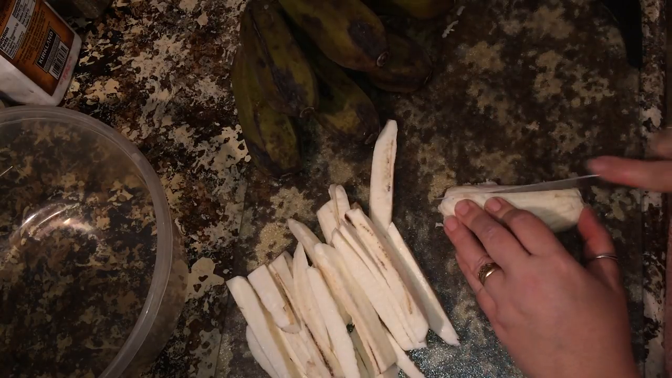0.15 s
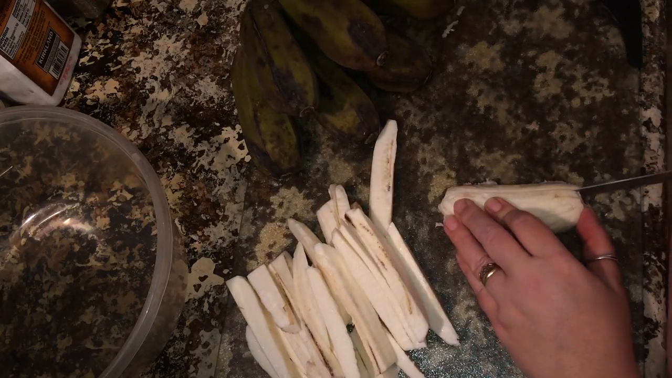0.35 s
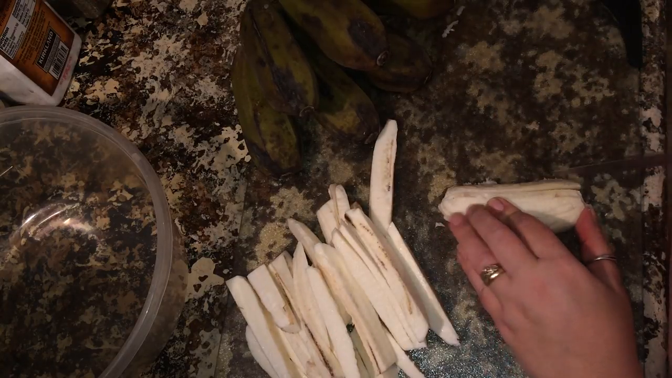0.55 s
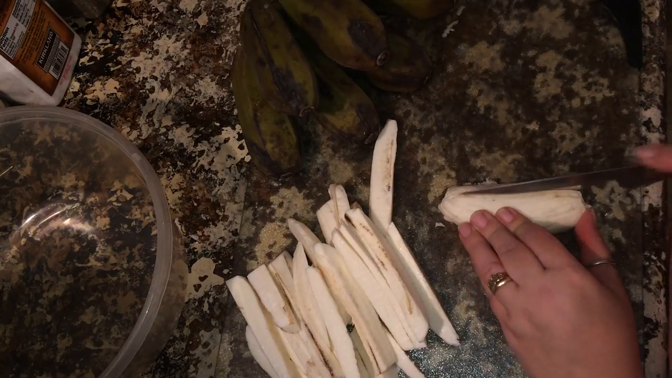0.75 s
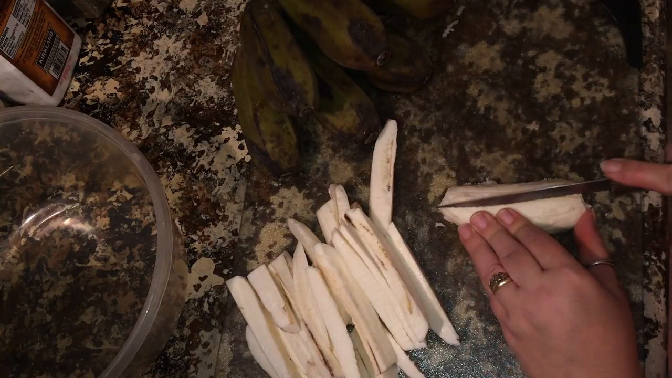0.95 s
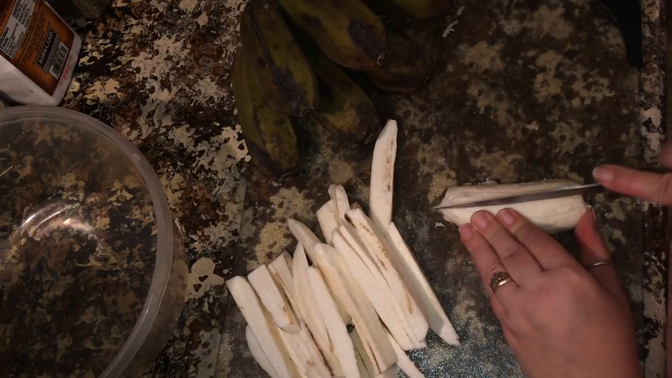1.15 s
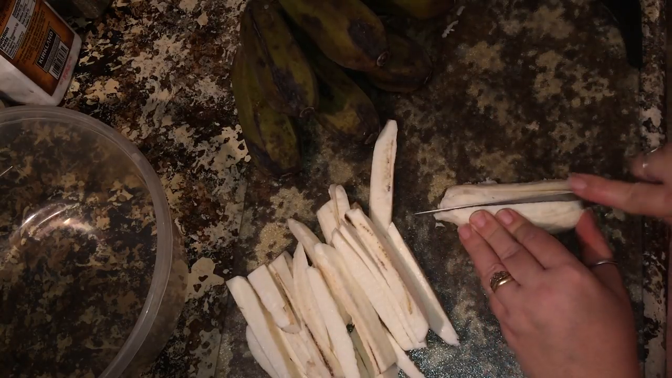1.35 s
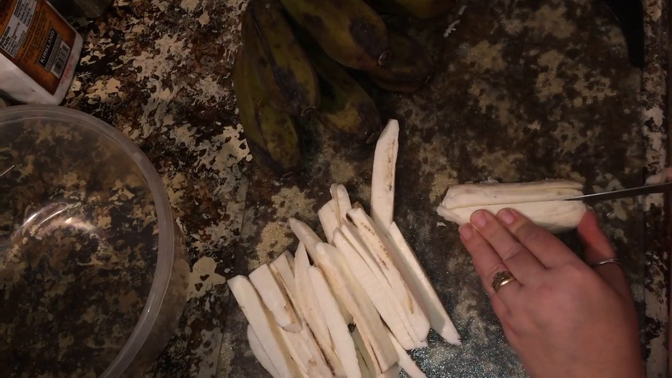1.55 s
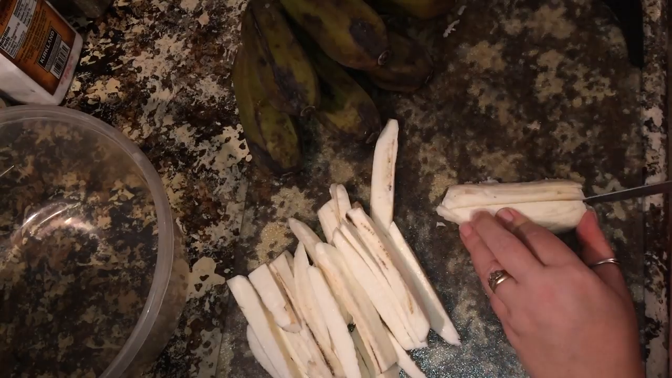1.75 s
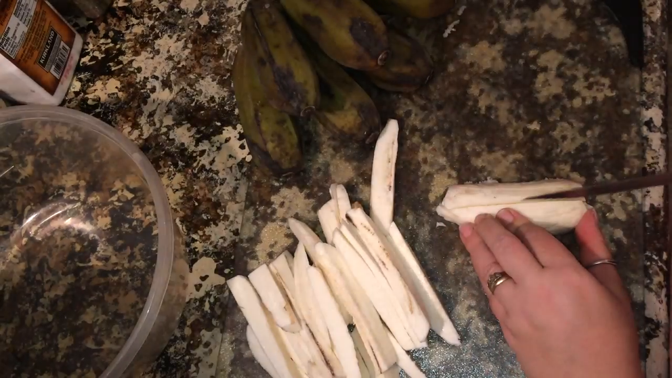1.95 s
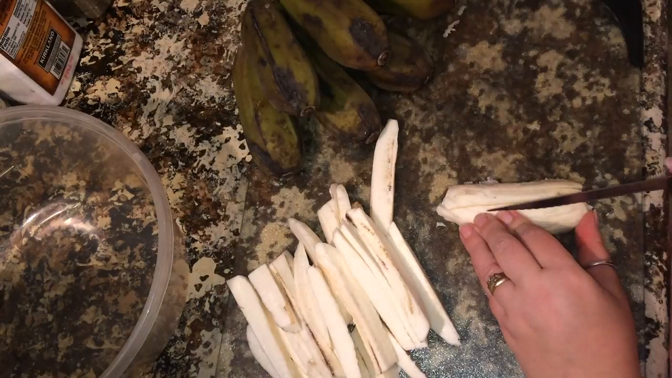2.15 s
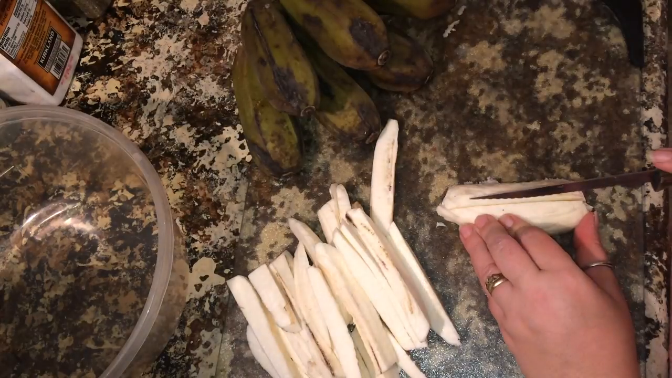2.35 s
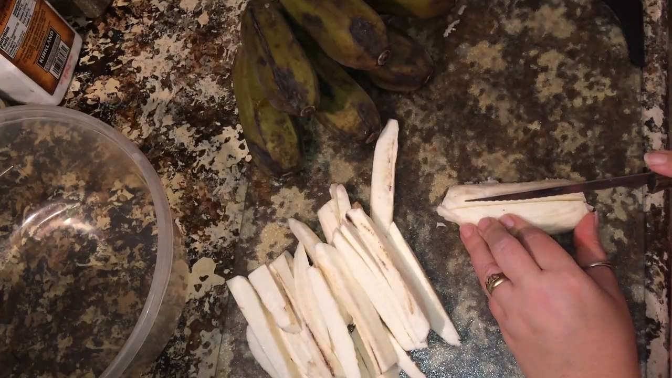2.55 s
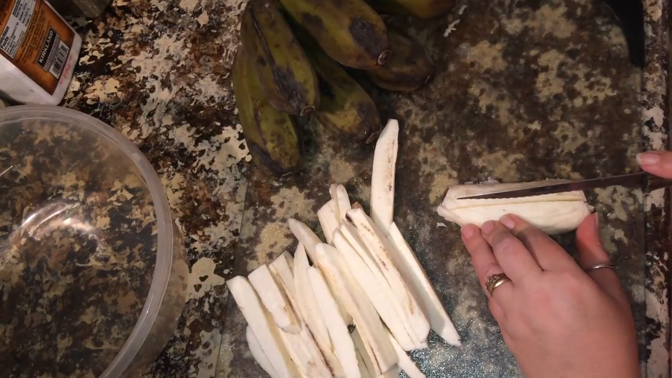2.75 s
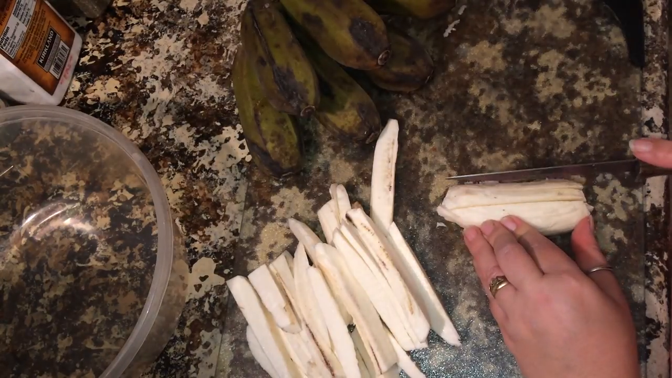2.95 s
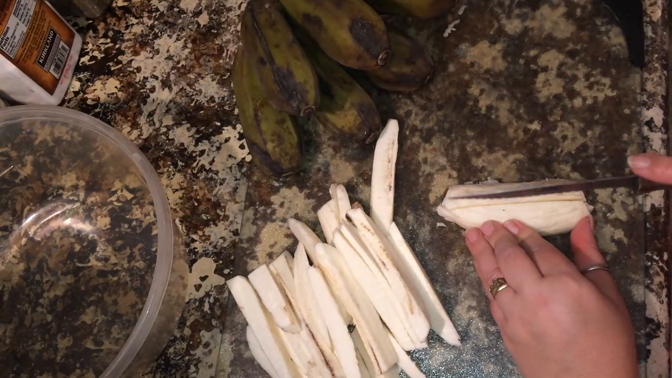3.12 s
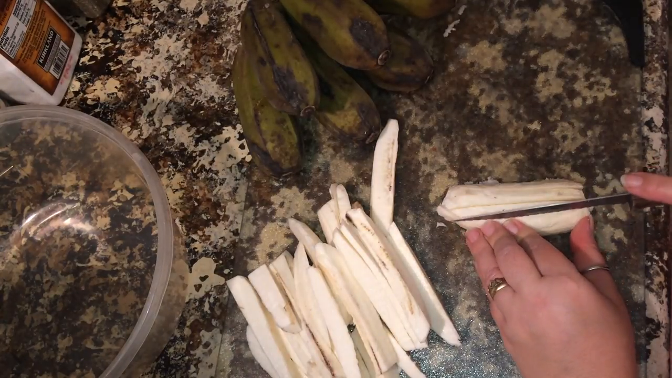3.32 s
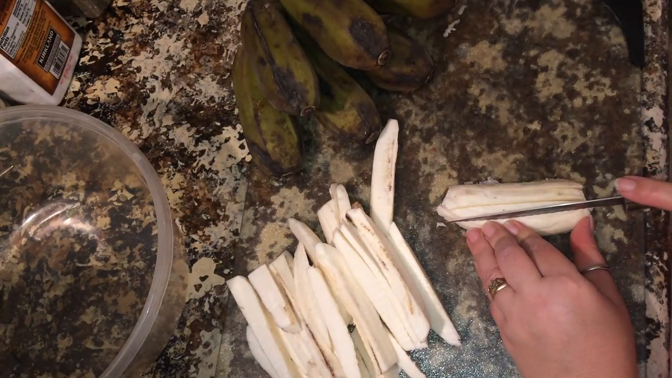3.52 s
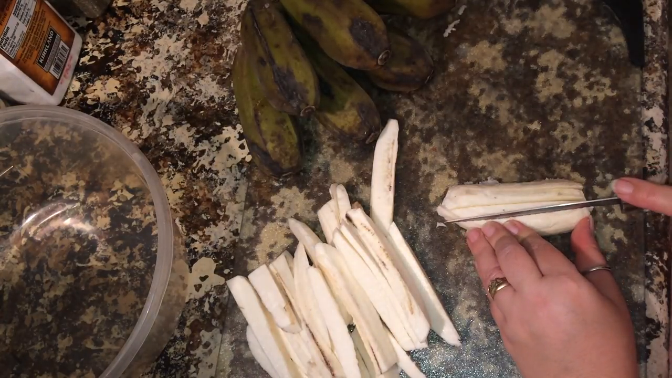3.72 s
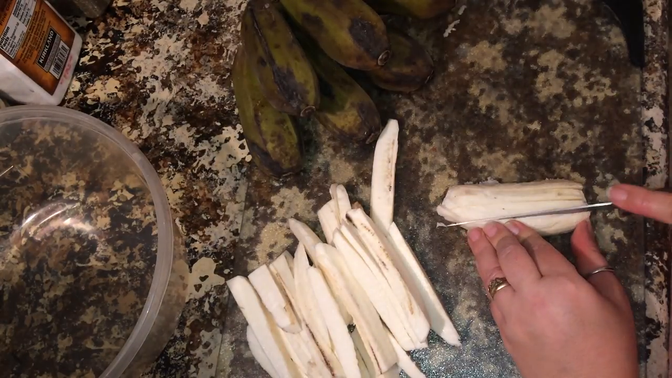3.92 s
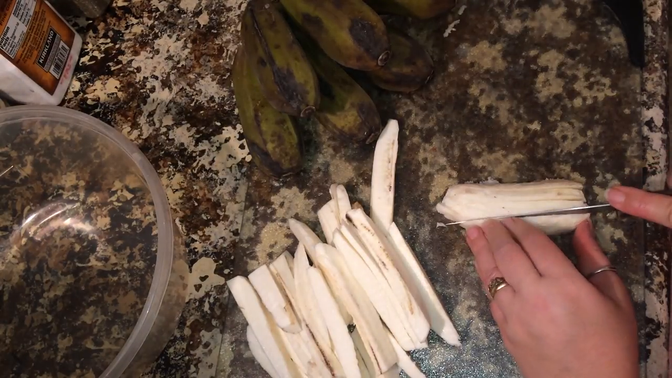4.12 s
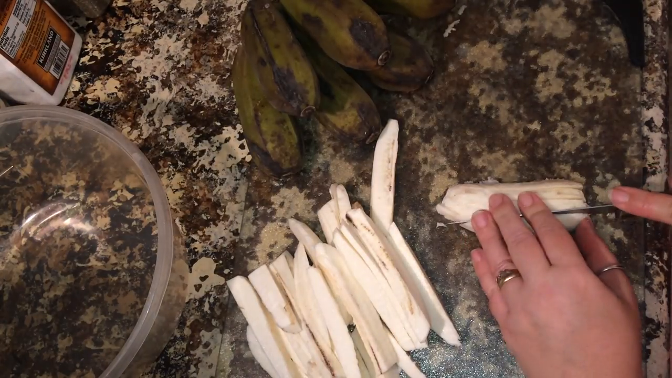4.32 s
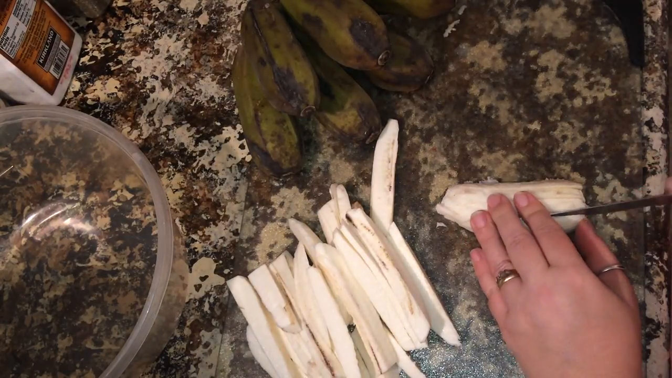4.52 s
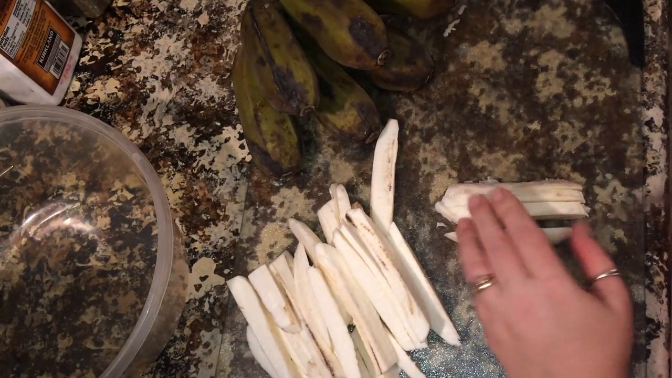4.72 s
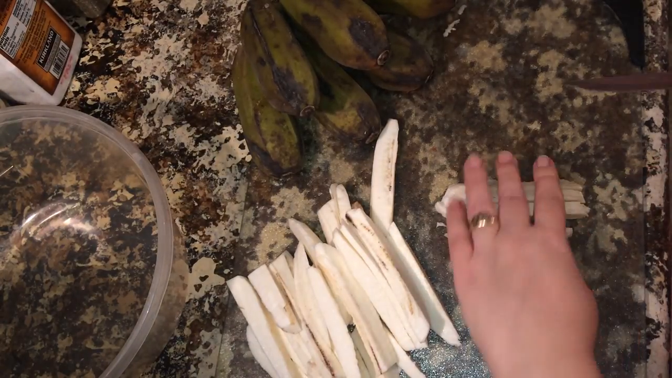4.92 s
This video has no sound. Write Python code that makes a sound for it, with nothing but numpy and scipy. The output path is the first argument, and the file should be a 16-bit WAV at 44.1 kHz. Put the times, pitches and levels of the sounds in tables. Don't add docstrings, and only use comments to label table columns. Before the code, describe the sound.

A knife clicks on a stone counter and scrapes with a gritty metallic rasp, twice quickly, then once more after a quiet gap, over faint fridge hum.

```python
import sys
import numpy as np
from scipy import signal
from scipy.fft import rfft, irfft, next_fast_len
from scipy.io import wavfile
from scipy.ndimage import uniform_filter1d, map_coordinates

SR = 44100
rng = np.random.default_rng(int(sys.argv[2]) if len(sys.argv) > 2 else 0)


def waveform_to_disk(signal):
    frames = np.transpose(np.atleast_2d(signal))
    scaled = np.clip(frames, -1, 1) * 32767
    samples = np.round(scaled).astype(np.int16)
    wavfile.write(sys.argv[1], SR, samples)


def boost_factor(decibels):
    exponent = np.asarray(decibels, float) / 20
    return 10 ** exponent


N = 223621

# pitch_hz, width_hz, level_db
HANDLE_RING = [(450, 39, -5), (687, 120, -1.5), (874, 165, -0.5), (969, 64, 1.5), (1035, 50, -5),
               (1314, 260, -9)]
# pitch_hz, width_hz, level_db
GRIPPED_RING = [(463, 60, -12.5), (731, 88, 1.5), (910, 120, -5), (996, 73, -3), (1314, 190, -23)]
# pitch_hz, width_hz, level_db
FLAT_RING = [
    [(1508, 110, -4.5), (1800, 68, 2.5), (2363, 150, 3), (2810, 63, 4), (3046, 48, 5.5), (3410, 300, 4.5),
     (3663, 72, 1.5)],
    [(4400, 400, -16.5), (5230, 99, 6), (5680, 240, 6), (6350, 120, 10)],
    [(7180, 650, 12), (7930, 200, 18), (8530, 650, 13), (9630, 140, 6.5), (10400, 400, -12),
     (11470, 470, 6.5), (13300, 1500, -49)],
]


def unit(x):
    return x / np.sqrt(np.mean(x ** 2) + 1e-20)


def along(points, hz):
    point_hz, value = np.transpose(points)
    return np.interp(np.log(hz + 1), np.log(point_hz + 1), value)


def curves(rows):
    s, *columns = np.transpose(rows)
    t = np.arange(N) / SR
    return np.array([np.interp(t, s, column) for column in columns])


def wobble(rate):
    knots = rng.standard_normal(int(N * rate / SR) + 4)
    return map_coordinates(knots, [np.arange(N) * rate / SR], order=1)


def swell(s, rise, fall):
    t = np.arange(N) / SR - s
    return np.maximum(-t / rise, t / fall)


def filtered(x, response):
    m = next_fast_len(len(x) + 8192)
    gain = response(np.fft.rfftfreq(m, 1 / SR))
    gain = gain / np.sqrt(np.mean(np.abs(gain) ** 2))
    return irfft(rfft(x, m) * gain, m)[:len(x)]


def ringing(modes, band, broad_db):
    def response(f):
        jf = 1j * f
        total = boost_factor(broad_db)
        for k, (pitch, width, db) in enumerate(modes):
            total = total + (-1) ** k * boost_factor(db) * jf * width / (pitch * pitch - f * f + jf * width)
        low, high = jf / band[0], jf / band[1]
        highpass = low ** 2 / (1 + np.sqrt(2) * low + low ** 2)
        lowpass = 1 / (1 + np.sqrt(2) * high + high ** 2)
        return total * (highpass * lowpass) ** 2
    return response


def grit(steady, snag_db, life):
    chance, size = rng.random(N), rng.random(N)
    snags = (chance < 450 / SR) * boost_factor(snag_db * size)
    jolts = signal.lfilter([1], [1, -np.exp(-1 / (life * SR))], snags)
    return (steady + jolts) * boost_factor(1.7 * wobble(250) + 1.5 * wobble(1400))


def levelled(force):
    return force / np.sqrt(np.abs(uniform_filter1d(force ** 2, size=800)))


def shifting(depth_db):
    z = signal.stft(rng.standard_normal((4, N)), nperseg=256)[2]
    field = rng.standard_normal(z.shape[1:])
    field = uniform_filter1d(field, size=3, axis=0)
    field = uniform_filter1d(field, size=12, axis=1)
    return unit(signal.istft(z * boost_factor(depth_db * unit(field)), nperseg=256)[1][:, :N])


def knife(strokes, hits, hold, modes, broad_db, force, noise):
    lean_share = np.array([1, 0.052, 0.088, 0.18])
    bite_share = np.array([0.11, 0, 0.85, 0.81])
    # low_hz, high_hz
    parts_hz = [(380, 1500), (1100, 4700), (3500, 8000), (6000, 19000)]
    crack, crack_t60_s = 0.84, 0.0025
    tick_db, tick_hz = -2, (800, 10000)
    level, shock = np.zeros((2, 4, N + SR))
    handle_db, edge_db, tip_db, tip_catch_db, t60 = hold

    firm = np.array([handle_db, 0, edge_db, tip_db])
    for rows in strokes:
        span = slice(round(rows[0][0] * SR), round(rows[-1][0] * SR))
        pressure, lean, bite = curves(rows)[:, span]
        rub_db = firm[:, None] + pressure + np.outer(lean_share, lean) + np.outer(bite_share, bite)
        level[:, span] += boost_factor(rub_db) * force[:, span]

    t = np.arange(SR // 10) / SR
    fade = boost_factor(-60 * t / max(t60, .002)) + crack * boost_factor(-60 * t / crack_t60_s)
    burst = fade * (1 - np.exp(-t / .00015))
    for s, db, weight, bite in hits:
        size = boost_factor(db - 7.5 + np.array([weight, 0, bite, bite + tip_catch_db]))
        start = round((s + .0009) * SR)
        level[:, start:][:, :len(t)] += np.outer(size * [.45, 0.89, 1, 1.3], burst)
        shock[:, start + 8] = size * [11.3, 4.2, 2.6, 4.6]

    busy = slice(round(strokes[0][0][0] * SR), round(strokes[-1][-1][0] * SR) + SR // 3)
    push = (level[:, :N] * noise + shock[:, :N])[:, busy]
    heard = boost_factor(tick_db) * filtered(shock[1, :N][busy], ringing([], tick_hz, 0))
    for part, peaks, band, base in zip(push, modes, parts_hz, broad_db):
        heard = heard + filtered(part, ringing(peaks, band, base))
    out = np.zeros(N)
    out[busy] = heard
    return out


def first_cut(force, noise):
    # start_s, pressure_db, lean_db (to the handle), bite_db
    strokes = [
        [(0.0, -60.5, 16.5, 7), (0.07, -50, 13.5, 0.5), (0.078, -35, 2, -14), (0.096, -45, 12, -6),
         (0.118, -41.5, 13, -2), (0.178, -60, 10, -8), (0.2, -59, 9, -3.5)],
        [(0.2, -55, 11, -3), (0.224, -34, 1, 4.5), (0.246, -28, -1, -0.5), (0.318, -24, 0, -1.5),
         (0.33, -23, -1, 2), (0.37, -25.5, -4.5, -0.5), (0.396, -24.5, -1, 0.5), (0.426, -28.5, 0.5, 2.5),
         (0.45, -34, -2.5, -3)],
    ]
    # start_s, peak_db, weight_db (on the handle), bite_db
    hits = [(0.077, -8, -6, -7.5), (0.1074, -27, 9, -18), (0.1175, -28, 5, -6), (0.1225, -26, -1, -13),
            (0.2163, -26, -7, -2), (0.2225, -24, -15, 2), (0.266, -22, -10, -6), (0.298, -22, -12, -8),
            (0.345, -22, -15, -8), (0.2483, -13.5, -6.5, -9), (0.282, -20, -15, 1.5),
            (0.3079, -29.5, -12, -14.5), (0.3176, -18, -21.5, -5), (0.3275, -13, -12, -2),
            (0.3346, -9, -15.5, -8), (0.3544, -22.5, -12.5, -14), (0.3643, -23, -18, -14),
            (0.3774, -14, -25, -8), (0.39, -14, -18, 4), (0.43, -22, -22, -12), (0.6776, -48, -12, -3)]
    # tip_db (against edge), t60_s
    hold = (-5.5, -6.5, -5.5, -3, 0.02)
    return knife(strokes, hits, hold, [HANDLE_RING] + FLAT_RING, [-10, -14, -1.5, -0.5], force, noise)


def background_level():
    # start_s, background_db
    ducks = [
        (.55, -3.5),
        (4.2, -1.6),
        (4.84, -7.5),
    ]
    body_db = -50.2
    for s, db in ducks:
        body_db = body_db + db * np.clip(1 - swell(s, 0.2, 0.21), 0, 1)
    return body_db


def refrigerator(body_db):
    # pitch_hz, width_hz, level_db
    hum_lines = [(58, 7, -66), (94.8, 6, -64.5), (120.8, 17, -60), (187.6, 12, -68), (215.3, 8.5, -68),
                 (268, 12, -64.5), (396.8, 5.6, -62), (433, 8.7, -70)]

    def lines(f):
        return sum(boost_factor(db + 60) / np.sqrt(w) / (1 + ((f - c) / w * 2) ** 2) for c, w, db in hum_lines)
    hum = boost_factor(body_db - 4.3) * filtered(rng.standard_normal(N), lines)
    buzz = np.sin(2 * np.pi * 119.5 * np.arange(N) / SR)
    return hum + boost_factor(body_db - 12.5 + 2.5 * wobble(11)) * buzz


def air(body_db):
    # pitch_hz, level_db (per Hz)
    colour = [(18, -30), (30, -22), (59, -0.5), (85, -28), (120, -5), (148, -9.5), (192, -3.5),
              (237, -10.5), (359, -11), (389, -9.5), (518, -13.5), (970, -9), (1970, -12), (2700, -16.5),
              (15500, -51)]

    def low_part(f):
        return 1 / (1 + (f / 4000) ** 4)
    rush = filtered(rng.standard_normal(N), lambda f: boost_factor(along(colour, f)) * low_part(f))
    hiss = filtered(rng.standard_normal(N), lambda f: boost_factor(along(colour, f)) * (1 - low_part(f)))
    rush = boost_factor(body_db + 0.5 + 1.13 * wobble(7.56)) * rush
    return rush + boost_factor(-63.5 + .6 * wobble(5.2)) * hiss


def fingers():
    # peak_s, level_db, rise_s, fall_s (through 20 dB)
    rustles = [
        (.02, -61.5, .1, 0.7),
        (.68, -58.5, .006, 0.25),
        (1.06, -75.5, .3, 7),
        (2.45, -76, .2, 0.1756),
        (2.66, -69, .13, 0.2333),
        (2.85, -68, .3, 0.5),
        (4.26, -64.5, 0.13, 0.23),
        (4.42, -65.5, .12, .1),
        (2.02, -69.5, 0.14, 0.2),
        (5.06, -70, .12, 1),
    ]
    skin = filtered(rng.standard_normal(N), lambda f: (f / 4500) ** 2 / (1 + (f / 4500) ** 3.8))
    moves = sum(boost_factor(db - 20 * swell(s, rise, fall)) for s, db, rise, fall in rustles)
    return moves * boost_factor(2.5 * wobble(60)) * skin


def kitchen(x):
    # pitch_hz, t60_s
    echo_t60 = [(200, 0.25), (1500, 0.24), (3200, 0.21), (6500, 0.26), (14000, 0.14)]
    out, step = np.zeros(N + SR), SR // 4
    for start in range(0, N, step):
        hz, t, z = signal.stft(rng.standard_normal(SR // 3), SR, nperseg=256)
        fade = boost_factor(-60 * t / along(echo_t60, hz)[:, None])
        tail = signal.istft(z * fade, SR, nperseg=256)[1]
        wet = signal.fftconvolve(x[start:start + step], tail / np.linalg.norm(tail))
        out[start + 260:][:len(wet)] += wet
    return out[:N]


def hand():
    # start_s, level_db, pitch_hz
    thumps = [
        (.23, -39.5, 209),
        (0.26, -48, 270),
        (.33, -53, 253),
        (0.501, -44, 249),
        (1.5, -50, 222),
        (4.511, -40, 200),
        (4.542, -37, 264),
        (4.619, -43, 250),
        (4.66, -43, 234),
    ]
    out, t = np.zeros(N + SR), np.arange(SR // 8) / SR
    for s, db, hz in thumps:
        shape = boost_factor(db + 6.5 - 60 * t / 0.11) * (1 - np.exp(-t / 0.0024))
        out[round(s * SR):][:len(t)] += shape * np.sin(2 * np.pi * hz * t)
    return out[:N]


def pings():
    # start_s, level_db, pitch_hz, t60_s
    sung = [(.249, -22, 2400, .03), (.284, -26, 5650, .02), (.334, -16, 3100, .03),
            (.3895, -10, 5620, .018), (.4, -22, 3350, .08), (.52, -32, 2800, .06), (1.352, -22, 3300, .04),
            (1.364, -20, 900, .02), (1.374, -24, 900, .03), (1.498, -22, 3800, .015),
            (1.577, -16, 2900, .04), (4.0045, -21, 850, .03), (4.016, -33, 850, .05),
            (4.598, -20, 4450, .03), (4.644, -15, 4450, .03), (4.655, -8, 4460, .025),
            (4.686, -14, 3300, .02), (4.692, -14, 3500, .015), (4.727, -26, 750, .08)]
    out, t = np.zeros(N + SR), np.arange(SR // 5) / SR
    for s, db, hz, t60 in sung:
        shape = boost_factor(db - 60 * t / t60) * (1 - np.exp(-t / .001))
        out[round(s * SR):][:len(t)] += shape * np.sin(2 * np.pi * hz * t)
    return out[:N] * boost_factor(2.5 * wobble(400))


def leaving(force, noise):
    # start_s, pressure_db, lean_db, bite_db
    strokes = [
        [(0.45, -31.5, 0, 0), (0.464, -34.5, 4.5, 1), (0.536, -33, -9, -9), (0.543, -48, 8, -10)],
        [(1.7, -34.5, 8, 3), (1.72, -35.5, -1, 8), (1.776, -35.5, 6, 7.5), (1.792, -29, -0.5, -4),
         (1.844, -34.5, -9, -8), (1.861, -40.5, -3, -8)],
    ]
    # start_s, peak_db, weight_db, bite_db
    hits = [(0.5064, -30, -5, -17), (0.5194, -24.5, -2.5, -14), (0.5364, -37, -5, -22),
            (1.7137, -25, -12, 2), (1.7342, -30, -12, 0), (1.7479, -19, -6.5, -3), (1.8, -26, -15, -14),
            (1.7754, -29, -18, -6), (1.7928, -21, -10, -14), (1.8138, -21, -37, -18),
            (1.8322, -24, -32, -14)]
    # tip_db (against edge), t60_s
    hold = (-8, -9, -9, -1.5, 0.018)
    # pitch_hz, width_hz, level_db
    steel = [
        [(1810, 170, -11), (2330, 130, -0.5), (2775, 103, 7.5), (3040, 170, 6), (3400, 160, 4.5),
         (3600, 139.8, 3)],
        [(4200, 540, -18), (5130, 240, 4), (5750, 440, 4.5), (6400, 400, -1.5)],
        [(6970, 460, 8), (8700, 500, 5), (10485, 600, -7), (13300, 1500, -15)],
    ]
    return knife(strokes, hits, hold, [GRIPPED_RING] + steel, [-28, -20, -8.5, -13], force, noise)


def second_landing(force, noise):
    # start_s, pressure_db, lean_db, bite_db
    strokes = [
        [(1.255, -60, 19, 3), (1.265, -49.5, 11, -3.5), (1.301, -56, 10, 8), (1.343, -47, 12.5, 5),
         (1.356, -29, -2, -10.5), (1.363, -38, 14, -2), (1.392, -31, 4, -1), (1.405, -41, 2, 0),
         (1.443, -59, -2, -3), (1.455, -52, 0, -3)],
    ]
    # start_s, peak_db, weight_db, bite_db
    hits = [
        (1.264, -38, 11, -3),
        (1.3478, -6.5, -7, -1),
        (1.3644, -23, 3, -14),
        (1.3686, -26, 0, -6),
        (1.3754, -26, 4, -8.5),
        (1.386, -24, 1.5, -6),
    ]
    # tip_db (against edge), t60_s
    hold = (-7, -3, -10, -8, 0.017)
    return knife(strokes, hits, hold, [HANDLE_RING] + FLAT_RING, [-8, -8, 2, -2], force, noise)


def second_cut(force, noise):
    # start_s, pressure_db, lean_db, bite_db
    strokes = [
        [(1.458, -49.5, 9, 1.5), (1.495, -29, 3.5, 4.5), (1.557, -23.5, -1.5, 2), (1.571, -32, 9, 6),
         (1.58, -22, -1.5, 1.5), (1.602, -32, -0.5, 4), (1.628, -27.5, 0, 3.5), (1.668, -33.5, 1.5, 2),
         (1.7, -35, 4, 2.5)],
    ]
    # start_s, peak_db, weight_db, bite_db
    hits = [(1.4822, -22, -6, 4.5), (1.4967, -19, -10, -3), (1.508, -25, -8, -3), (1.5194, -22.5, -6, -3),
            (1.536, -22, -10, -3), (1.545, -22, -10, -3), (1.5516, -12, -11, -2.5), (1.5756, -11, -20, -5),
            (1.5785, -17, -20, -5), (1.588, -20, -15, -8), (1.6147, -16, -10, -6), (1.625, -24, -10, -6),
            (1.6326, -25.5, 4.5, -13), (1.6826, -19, -3.5, -1), (1.696, -25, -6, -2)]
    # tip_db (against edge), t60_s
    hold = (-6, -4, -10, -5, 0.016)
    return knife(strokes, hits, hold, [HANDLE_RING] + FLAT_RING, [-12, -10.5, -2, -11], force, noise)


def upright_skid(force, noise):
    # start_s, pressure_db, lean_db, bite_db
    strokes = [
        [(4.003, -43, 10, 5), (4.014, -50, 15, 0), (4.038, -50, 3, 0), (4.045, -33, 1, -5),
         (4.06, -32.5, -4, 1.5), (4.097, -40.5, -6.5, 4), (4.179, -62, -2, 5), (4.22, -71, 11, 8)],
    ]
    # start_s, peak_db, weight_db, bite_db
    hits = [
        (4.0021, -40, 8, 5),
        (4.0405, -7.5, -13, 4),
    ]
    # tip_db (against edge), t60_s
    hold = (-8.5, -4.5, -6.5, -12.5, 0.0155)
    # pitch_hz, width_hz, level_db
    handle = [(470, 53, -12), (820, 150, 0.5), (1020, 190, -23.5)]
    # pitch_hz, width_hz, level_db
    steel = [
        [(1450, 49, -19), (2500, 420, 2), (3070, 230, 2), (3520, 150, 5.5)],
        [(4940, 230, -10), (5580, 300, 5), (6260, 300, 4)],
        [(7140, 400, 7.5), (8760, 1000, 3.5), (10100, 800, -12.5), (13300, 1500, -17.5)],
    ]
    return knife(strokes, hits, hold, [handle] + steel, [-12, -7, -2, -7], force, noise)


def tilted_push(force, noise):
    # start_s, pressure_db, lean_db, bite_db
    strokes = [
        [(4.455, -65, 13, 12), (4.484, -41, 6, 0), (4.497, -30.5, 1, -3.5), (4.577, -28.5, 3, 3.5),
         (4.635, -23.5, 1.5, 2.5), (4.652, -25, 0, 2.5)],
        [(4.652, -22, -3, 2.5), (4.693, -19.5, -8, 0), (4.697, -29, -4, 0), (4.71, -22.5, -7, -2),
         (4.74, -23.5, 0, -3), (4.755, -26.5, -2, -1), (4.782, -29, -2, 2), (4.797, -39, -3, -1)],
    ]
    # start_s, peak_db, weight_db, bite_db
    catches = [(4.4735, -34, -22, -12.5), (4.4868, -18, -29, -6), (4.5219, -17.5, -10.5, -3),
               (4.5337, -22, -12, 0), (4.5462, -20, -12, 0), (4.5506, -20, -12, 2.5), (4.679, -16, -20, -6),
               (4.729, -18, -10, -6), (4.5686, -23, -17, 0), (4.5973, -14, -23, -2.5), (4.6194, -25, -4, 0),
               (4.6425, -13, -2.5, -3.5), (4.6561, -7.5, -11, 2), (4.664, -12, -18, -8),
               (4.6864, -14.5, -21, -1), (4.6926, -11, -22, -12), (4.7074, -18.5, -17, -4),
               (4.72, -10.5, -10, -7.5), (4.7449, -16.5, -8, -11), (4.7681, -16.5, -19, -3),
               (4.7849, -27, -24, -23)]
    # tip_db (against edge), t60_s
    hold = (-9.5, -4, -15, -15, 0.015)
    # pitch_hz, width_hz, level_db
    steel = [
        [(1810, 260, -9), (1500, 500, 1), (2330, 120, 10), (2755, 94, 6.5), (3110, 220, 6.5), (3326, 180, 8),
         (3710, 210, 8.5)],
        [(4450, 170, 9.5), (5200, 77, 7), (5700, 300, 0.5), (6400, 68, -13.5)],
        [(7100, 150, 11.5), (7270, 490, 32), (8900, 900, -3), (10800, 1100, -14), (13400, 1800, -16)],
    ]
    # pitch_hz, width_hz, level_db
    turned_blade = [(1300, 300, -14), (1850, 260, -3), (2300, 140, 0), (2755, 110, 8), (3110, 220, 7),
                    (3400, 180, 9), (3710, 210, 8.5)]
    turn_s = 4.652
    out = np.zeros(N)
    for stroke, blade, late in zip(strokes, (steel[0], turned_blade), (False, True)):
        hits = [hit for hit in catches if (hit[0] > turn_s) == late]
        modes = [GRIPPED_RING, blade] + steel[1:]
        out = out + knife([stroke], hits, hold, modes, [-13, -10, -10.5, -7.5], force, noise)
    return out


def scene():
    grain = grit(steady=1.0, snag_db=4.5, life=0.00061)
    noise = shifting(depth_db=2.0)
    own_db = (0.47, 0.98, 1.6, 1.4)
    force = np.array([levelled(grain * boost_factor(db * wobble(150))) for db in own_db])
    blade = pings()
    for action in (first_cut, leaving, second_landing, second_cut, upright_skid, tilted_push):
        blade = blade + action(force, noise)
    body_db = background_level()
    behind = refrigerator(body_db) + air(body_db) + fingers()
    return (blade + boost_factor(-12.5) * kitchen(blade) + hand() + behind)[None]


def low_pass(x):
    return signal.sosfilt(signal.butter(12, 16640, fs=SR, output="sos"), x)


def record(dry):
    hz = np.fft.rfftfreq(N + 8192, 1 / SR)
    top = np.where(hz < 15450, 1, boost_factor(-38)) * (hz < 16640)
    heard = irfft(rfft(dry, N + 8192) * top, N + 8192)[:, :N]
    return low_pass(heard)


dry = scene()
out = record(dry)
waveform_to_disk(out)
```